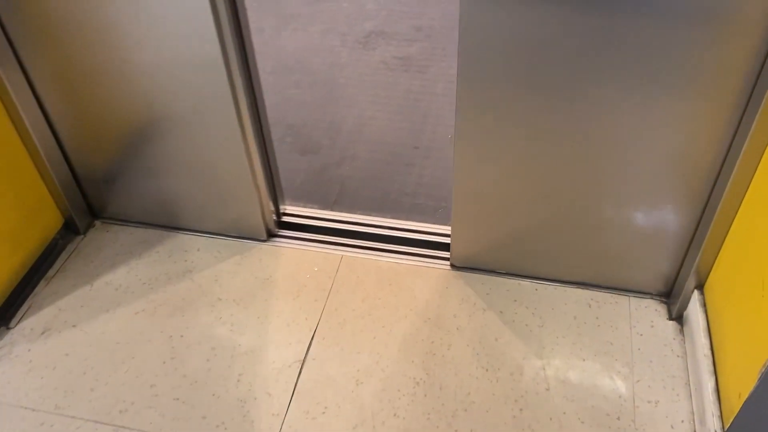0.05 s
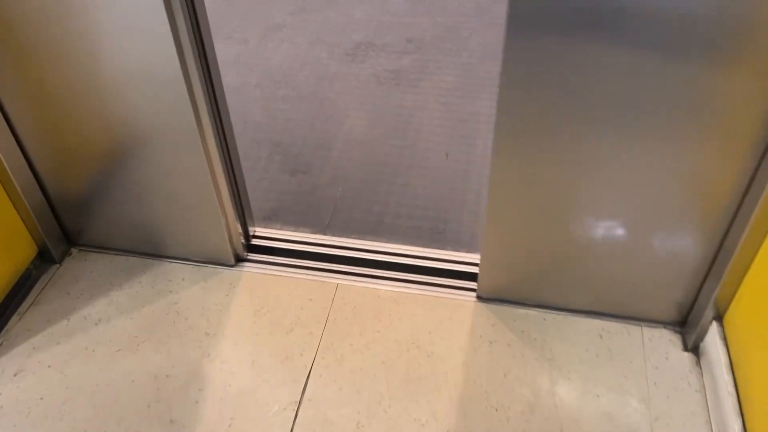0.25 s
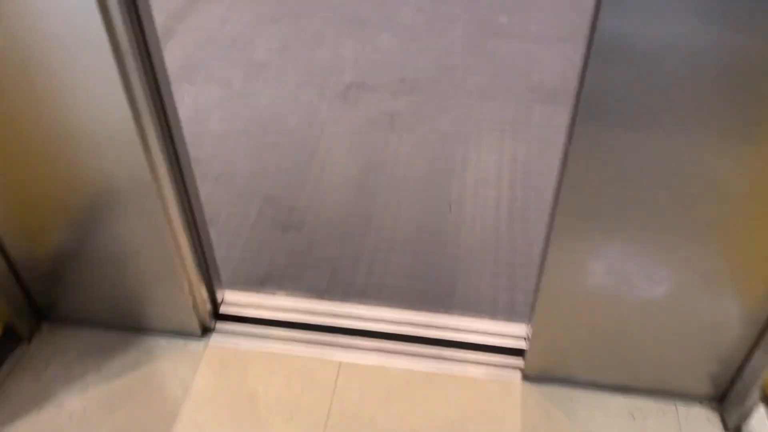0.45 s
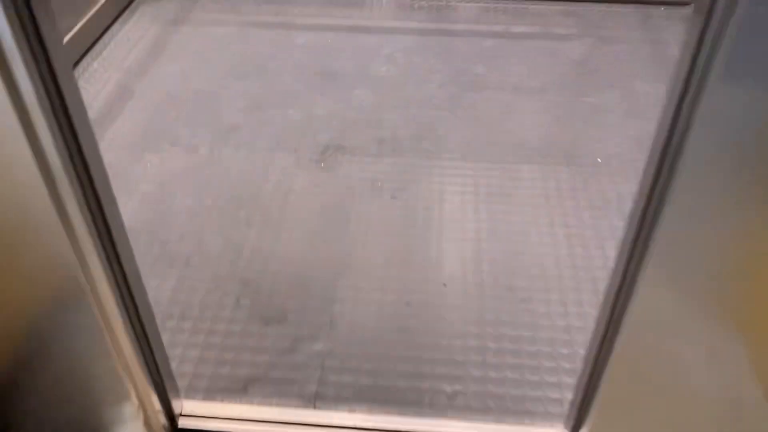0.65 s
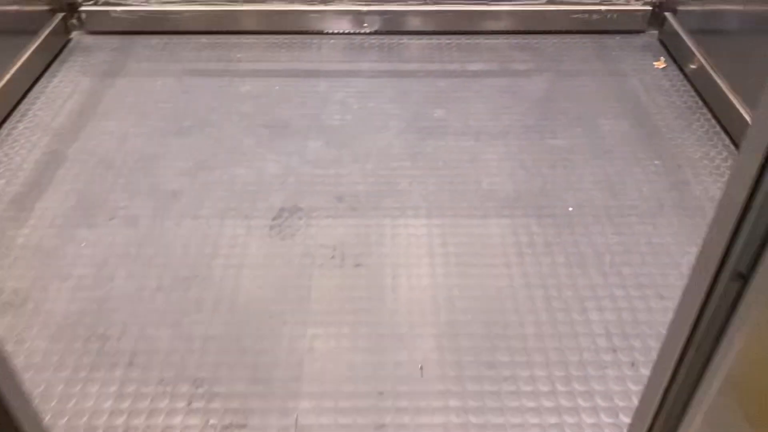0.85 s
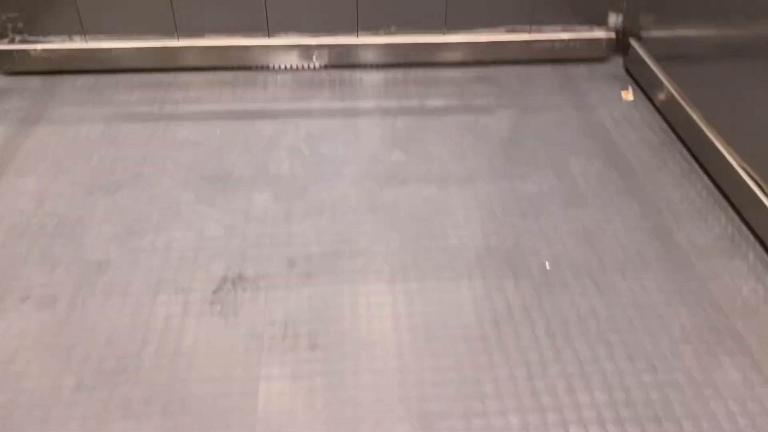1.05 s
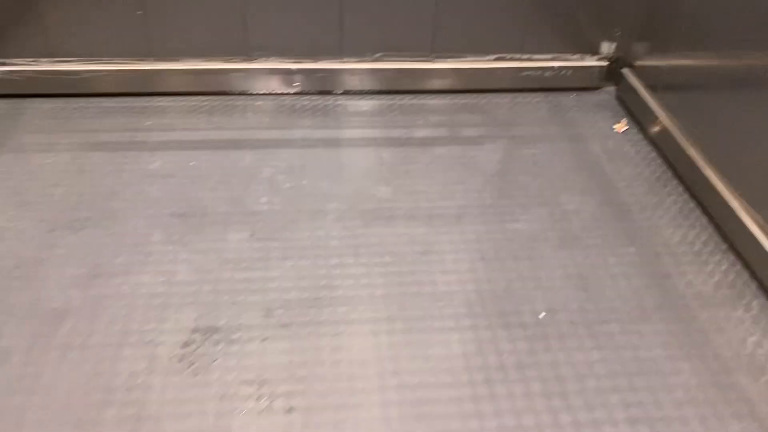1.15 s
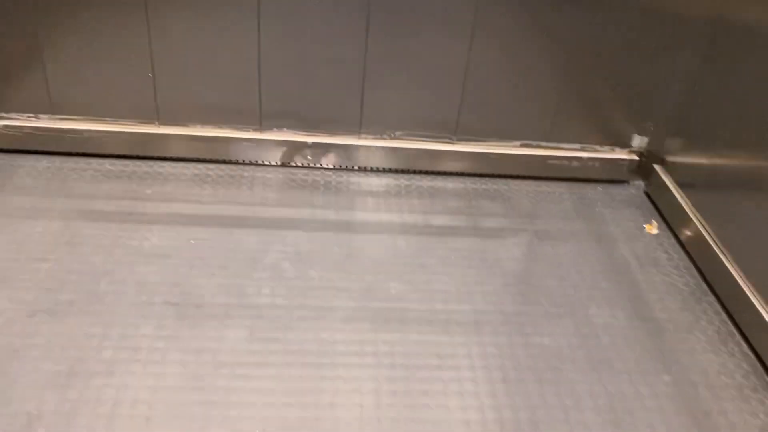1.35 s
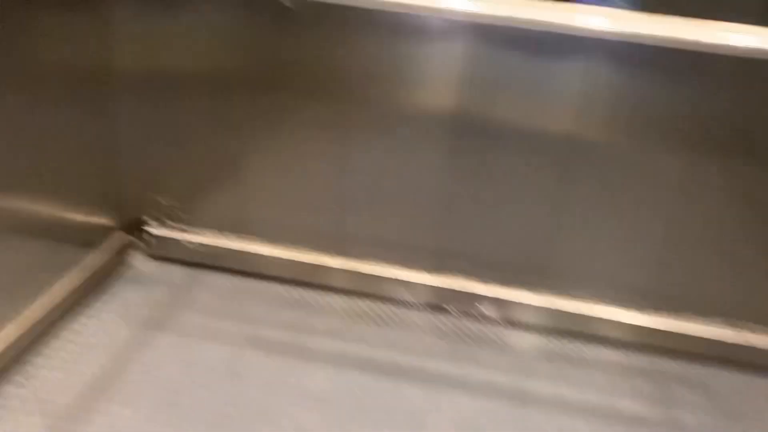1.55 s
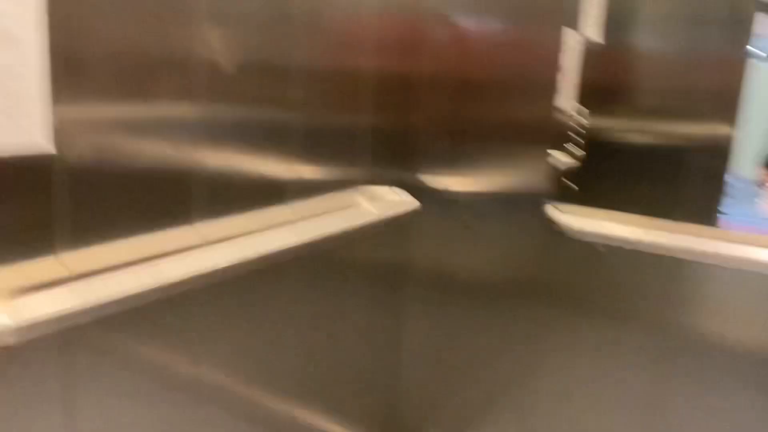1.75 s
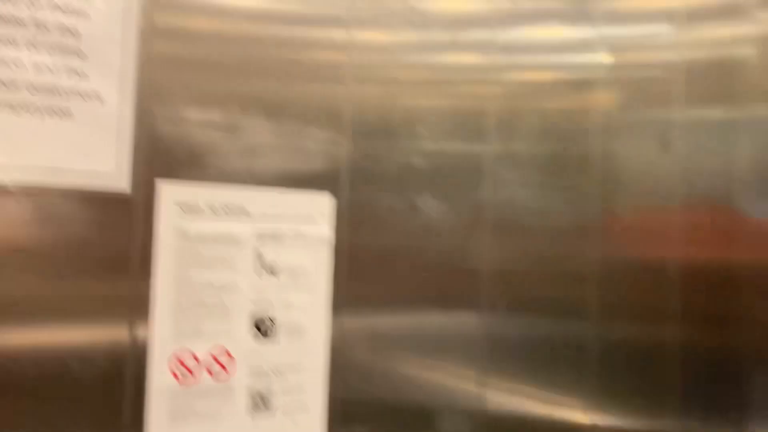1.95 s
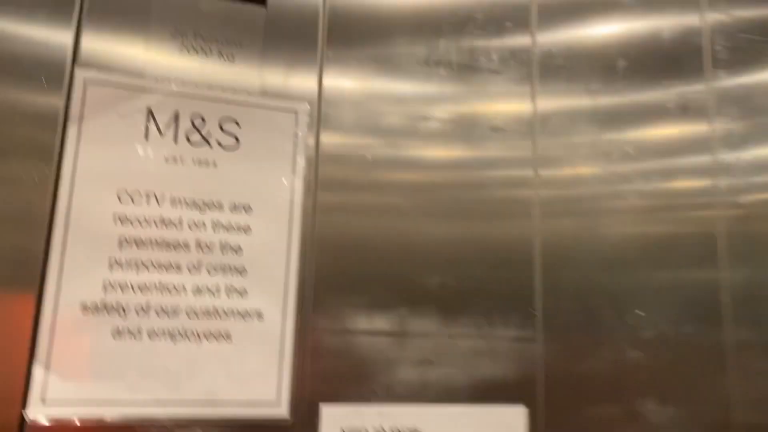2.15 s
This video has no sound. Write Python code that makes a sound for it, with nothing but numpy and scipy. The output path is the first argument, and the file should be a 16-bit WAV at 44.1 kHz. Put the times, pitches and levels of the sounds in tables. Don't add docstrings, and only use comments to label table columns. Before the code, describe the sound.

Lift doors slide open indoors: soft ventilation hum and a faint high whine, a small knock near 0.1 s, then a loud hollow metal bang at 0.2 s. Rattling rebounds follow until 0.5 s, another at 0.8 s, while the sheets boom and throb with dense shaft echoes. Ringing is damped after 1.2 s; light knocks from 1.6 s, faint scuffing, and a thin rising whine remain to 2.2 s.

```python
import sys
import numpy as np
from scipy import signal
from scipy.fft import rfft, irfft, next_fast_len
from scipy.io import wavfile

SR = 44100
rng = np.random.default_rng(int(sys.argv[2]) if len(sys.argv) > 2 else 0)


def persist_wave(psi):
    counts = np.round(np.clip(psi, -1, 1) * 32767).astype(np.int16)
    wavfile.write(sys.argv[1], SR, np.atleast_2d(counts).T)


def natural_amplitude(level_db):
    exponent = np.asarray(level_db, float) / 20
    return 10 ** exponent


N = 97020
T = np.arange(N) / SR


def rms_one(x):
    return x / np.sqrt(np.mean(x ** 2) + 1e-20)


def at_hz(points, hz, column=1):
    points = np.array(points)
    return np.interp(np.log(hz), np.log(points[:, 0]), points[:, column])


def bandpass(x, order, low_hz, high_hz):
    return signal.sosfilt(signal.butter(order, [low_hz, high_hz], "band", fs=SR, output="sos"), x)


def drift(rate_hz):
    r = np.exp(-80 * np.pi * rate_hz / SR)
    slow = signal.lfilter([1], [1, -2 * r, r * r], rng.standard_normal(N // 40 + 2002))[2000:]
    return np.interp(np.arange(N) / 40, np.arange(len(slow)), rms_one(slow))


def swell(start_s, rise_s, t60_s):
    age_s = np.maximum(T - start_s, 0)
    return (1 - np.exp(-age_s / rise_s)) ** 2 * natural_amplitude(-60 * age_s / t60_s)


def bands(spectrum, shape, patchy_db):
    edges_hz = 25 * 2 ** np.arange(0, 9.5, 1 / 3)
    white = rng.standard_normal((2, 2, N + 8000))
    power = sum(natural_amplitude(2 * at_hz(spectrum, edge)) * edge * .23 for edge in edges_hz) / (SR / 2)
    out = 0
    for k, (low, high) in enumerate(zip(edges_hz, edges_hz[1:])):
        hz = np.sqrt(low * high)
        noise = bandpass(white[k % 2], 2, low, high)[:, 8000:]
        flicker_db = patchy_db * drift(11.0)
        out = out + natural_amplitude(at_hz(spectrum, hz) + flicker_db) * shape(hz) * noise
    return out / np.sqrt(power)


def air():
    # f/Hz, level/dB per Hz
    rush = [(30, -2), (80, -1.5), (200, -1), (500, -9), (1000, -15.5), (2000, -19.5), (6000, -31),
            (15000, -46.5)]
    # t/s, level/dB
    fan_level = [(0, -38), (.2, -37), (1.15, -36), (1.299, -38), (1.57, -38), (1.63, -36), (1.85, -38),
                 (1.92, -39), (2.2, -39)]
    # f/Hz, width/Hz, level/dB
    duct_modes = [(34.6, 4, -49.5), (80.7, 2.3, -41), (173, 6.7, -45), (198.6, 3.3, -46),
                  (334.9, 7.6, -50.5), (2035, 250, -53.5)]
    hum = 0
    for hz, width_hz, level_db in duct_modes:
        r = np.exp(-np.pi * width_hz / SR)
        poles = [1, -2 * r * np.cos(2 * np.pi * hz / SR), r * r]
        tone = signal.lfilter([1, 0, -1], poles, rng.standard_normal((2, N + SR)))
        hum = hum + natural_amplitude(level_db + 35) * rms_one(tone[:, SR:])
    s, db = np.transpose(fan_level)
    return natural_amplitude(np.interp(T, s, db)) * (bands(rush, lambda hz: 1, patchy_db=1.7) + hum)


def whistle():
    # t/s, f/Hz, level/dB
    drive_line = [(0, 5380, -58), (.2, 5520, -59), (.4, 5650, -70), (1.0, 5880, -67), (1.75, 6200, -69),
                  (1.9, 6550, -61), (2.1, 6820, -59), (2.2, 6880, -60)]
    s, hz, db = np.transpose(drive_line)
    line_hz = np.interp(T, s, hz) + (10 + 20 * T ** 3) * drift(150.0)
    line = natural_amplitude(np.interp(T, s, db) + 2 * drift(25.0)) * np.sin(2 * np.pi * np.cumsum(line_hz) / SR)
    squeak_hz = 12450 + 30 * drift(50.0)
    squeak = natural_amplitude(-70) * swell(2.08, 0.011, 3.0) * np.sin(2 * np.pi * np.cumsum(squeak_hz) / SR)
    return line + squeak


def impacts(hits):
    ring_cycles, crack_db, crack_s = 12, -22, 0.0063
    white = rms_one(bandpass(rng.standard_normal((2, N)), 3, 500, 2500))
    out = np.zeros((2, N))
    for s, db, hz in hits:
        age_s = np.maximum(T - s, 0)
        partials = sum(np.sin(2 * np.pi * hz * part * age_s) / part for part in (1, 1.47, 2.3))
        ring = partials * swell(s, 0.4 / hz, ring_cycles / hz)
        crack = natural_amplitude(crack_db) * white * (T > s) * np.exp(-age_s / crack_s)
        out += natural_amplitude(db) * (ring + crack)
    return out


def small_knocks():
    # t/s, level/dB, ring f/Hz
    knock_hits = [
        (.077, -26, 650),
        (.1, -30, 900),
        (1.609, -25, 570),
        (1.665, -32, 400),
        (1.745, -29, 200),
        (1.85, -33, 200),
        (2.195, -30, 400),
    ]
    return impacts(knock_hits)


def shaft():
    # f/Hz, level/dB per Hz
    shaft_answer = [(70, -24.5), (200, -9.5), (330, -2), (500, 0), (750, -4), (1050, -11.5), (2100, -19.5),
                    (5000, -34)]
    # f/Hz, t60/s
    shaft_decay = [(100, 3.4), (400, 2.04), (1500, 1.92), (4000, 2.03), (10000, 0.42)]
    bang_s, rise_s, rise_tilt = 0.206, 0.025, 0.1

    def echo(hz):
        build = swell(bang_s - .008, rise_s * (400 / hz) ** rise_tilt, at_hz(shaft_decay, hz))
        return build * min(1, 5000 / hz) ** 2.2

    return natural_amplitude(-14) * bands(shaft_answer, echo, patchy_db=1.0)


def rattles():
    # t/s, level/dB, ring f/Hz
    rattle_hits = [
        (.199, -26, 800),
        (.206, -24, 160),
        (.2245, -10, 620),
        (.296, -20, 600),
        (.368, -18, 650),
        (.405, -18, 440),
        (.505, -21, 340),
        (.771, -22, 700),
    ]
    return impacts(rattle_hits)


def scuffs():
    # t/s, level/dB, rise/s, fall t60/s
    strokes = [
        (.2098, -37, .0002, .008),
        (.2136, -35, .0002, .01),
        (2.196, -48, .0005, .05),
        (.575, -53.5, .01, .7),
        (.214, -54, .004, .9),
        (.92, -59, .015, 1.8),
        (1.4, -60, .15, 3.0),
    ]
    # f/Hz, level/dB per Hz
    hiss_colour = [(1500, -23), (4000, -1), (7800, -6.5), (9500, 0), (12500, -3), (15500, -13)]
    stroke = sum(natural_amplitude(db) * swell(s, rise_s, t60_s) for s, db, rise_s, t60_s in strokes)
    return stroke * bands(hiss_colour, lambda hz: 1, patchy_db=.6)


def sheets():
    # f/Hz, level/dB, t60/s, beat/Hz, loudest beat t/s
    sheet_modes = [(79, -21, 4.0, 4.4, .56), (99, -20, 3.0, 2.9, .67), (152, -14, 3.2, 3.3, .55),
                   (219, -18, .7, 5.5, .28), (315, -11, .8, 4.8, .265), (340, -19, 2.4, 9.2, .405),
                   (444, -10, 1.3, 10.5, .33), (526, -14, 1.3, 11.0, .27), (568, -16, 1.3, 9.0, .37),
                   (630, -22, 1.6, 8.0, .29), (737, -14, 1.2, 5.5, .33), (1042, -25, 1.4, 9.0, .3),
                   (1188, -29, 1.4, 9.0, .33), (2089, -34, 2.0, 8.0, .3)]
    touch_s, rise_s, rise_tilt, beat_depth = 0.215, .024, 2.1, .85
    rest_s, rest_t60_s = 1.198, 0.2
    out = np.zeros((2, N))
    for hz, db, t60_s, beat_hz, peak_s in sheet_modes:
        turn = 2 * np.pi * (hz * T + rng.random((2, 1)) + 0.042 * drift(2.0))
        throb = np.pi * beat_hz * (T - peak_s)
        pair = np.cos(throb) * np.sin(turn) + (1 - beat_depth) * np.sin(throb) * np.cos(turn)
        mode_rise_s = rise_s * max(318 / hz, .9) ** rise_tilt
        out += natural_amplitude(db) * swell(touch_s, mode_rise_s, t60_s) * pair
    return out * natural_amplitude(-60 * np.maximum(T - rest_s, 0) / rest_t60_s)


def scene():
    room = air() + whistle() * [[1], [.3]] + small_knocks() + scuffs()
    doors = shaft() + rattles() + sheets()
    return room + doors


def band_limit(x):
    return signal.sosfilt(signal.butter(12, 17000, fs=SR, output="sos"), x)


def record(dry):
    # f/Hz, unlike share/dB, left lead/rad, left-right/dB
    port_pair = [(170, -31, 0, 0), (400, -19, -.3, 2.5), (750, -6, -1.5, 3), (1150, -2, -2, -2),
                 (1900, -5, .2, -1), (2700, -1, 1.4, -.5), (5000, -5, .5, 0), (7450, -22, 3.14, 0)]
    lag_s, cutoff_hz, ceiling = .000165, 15850, .9
    size = next_fast_len(N + 4096)
    hz = np.maximum(np.arange(size // 2 + 1) * SR / size, 1)
    shared, unlike = rfft(dry, size)
    share = np.minimum(natural_amplitude(at_hz(port_pair, hz)), 1)
    side = np.array([[1], [-1]])
    above_hz = np.maximum(hz - port_pair[-1][0], 0)
    lead = at_hz(port_pair, hz, column=2) + 2 * np.pi * lag_s * above_hz
    ports = (shared + side * share * unlike) / np.sqrt(1 + share ** 2)
    ports = ports * np.exp(.5j * side * lead) * natural_amplitude(side * at_hz(port_pair, hz, column=3) / 2)
    heard = irfft(ports * (hz < cutoff_hz), size)[:, :N]
    return band_limit(ceiling * np.tanh(heard / ceiling))


dry = scene()
out = record(dry)
persist_wave(out)
```